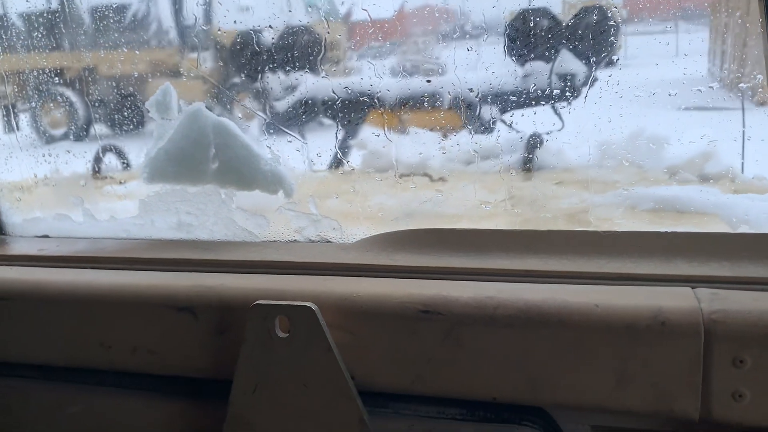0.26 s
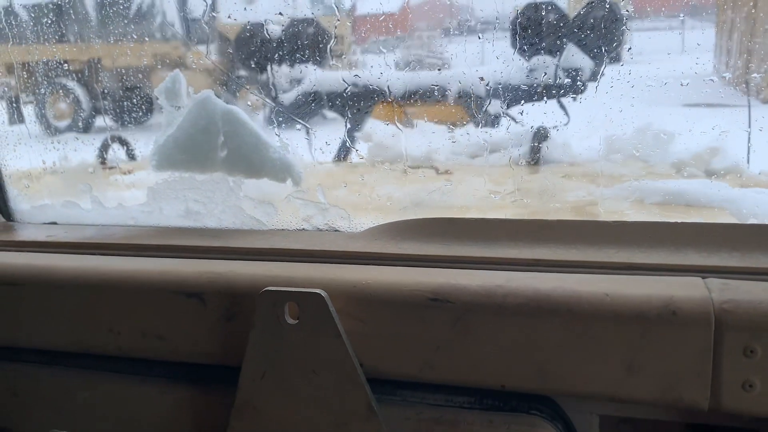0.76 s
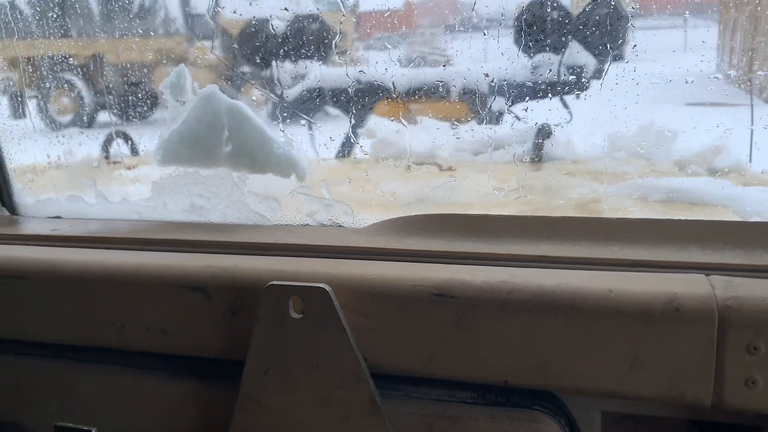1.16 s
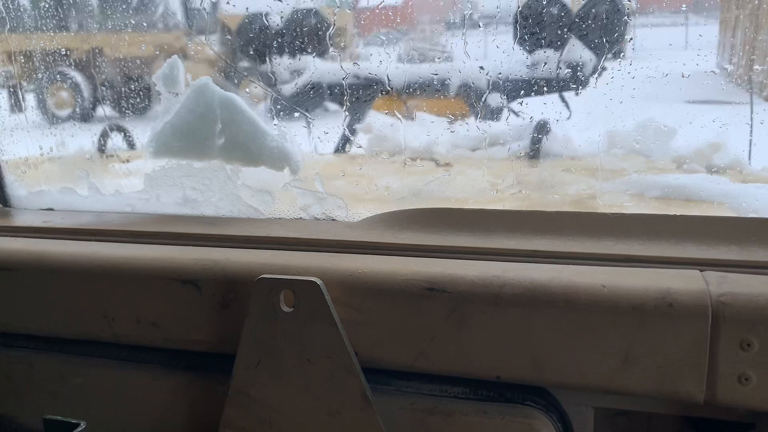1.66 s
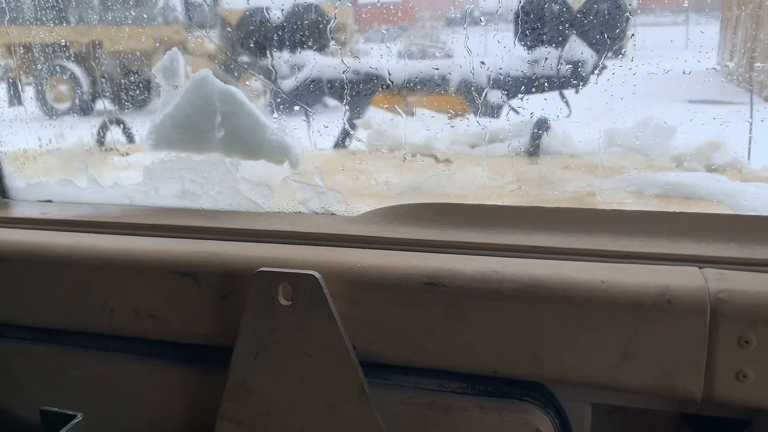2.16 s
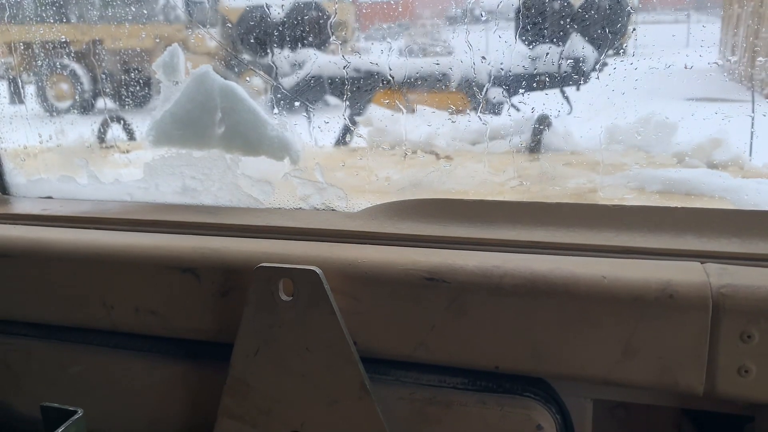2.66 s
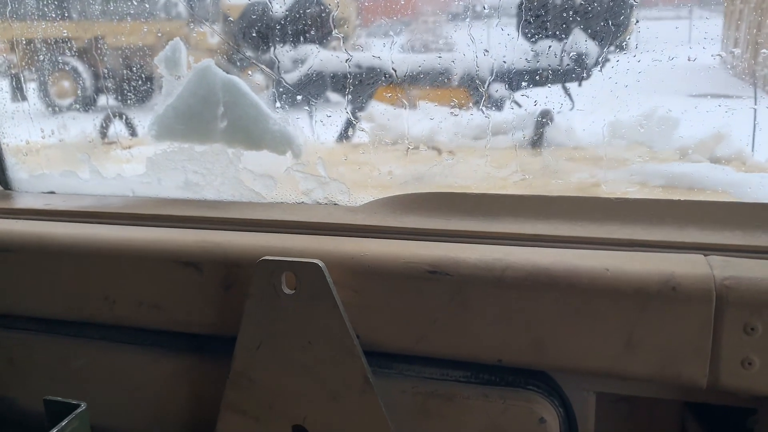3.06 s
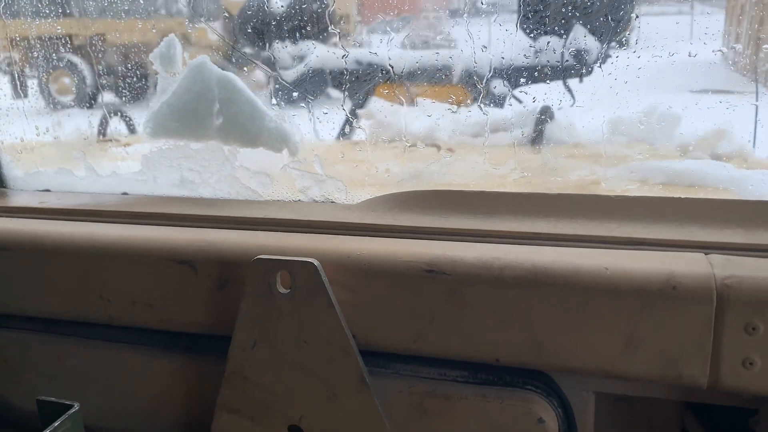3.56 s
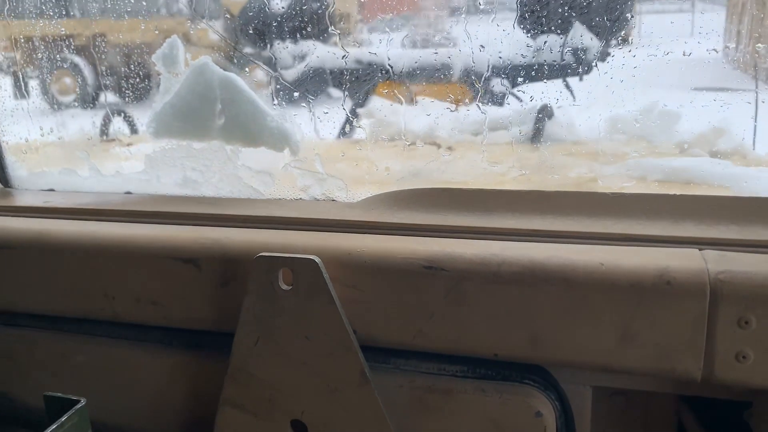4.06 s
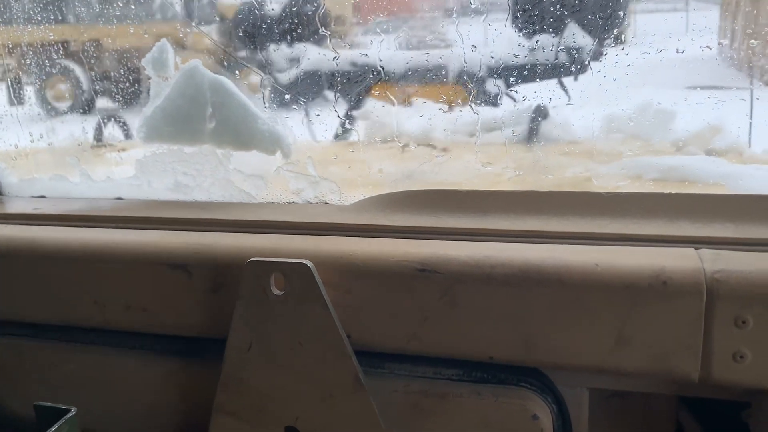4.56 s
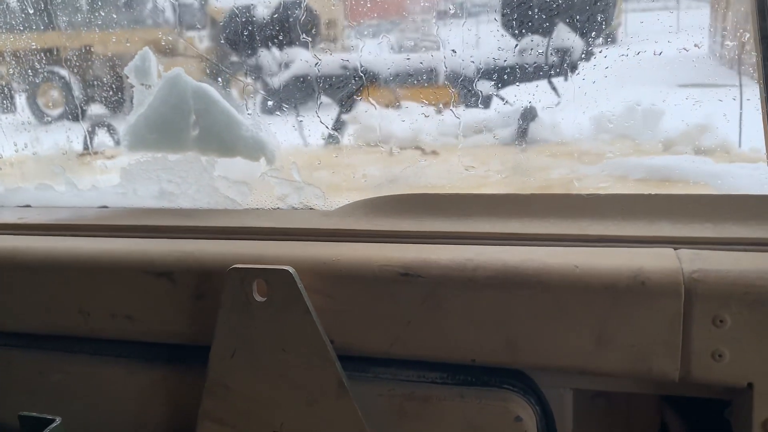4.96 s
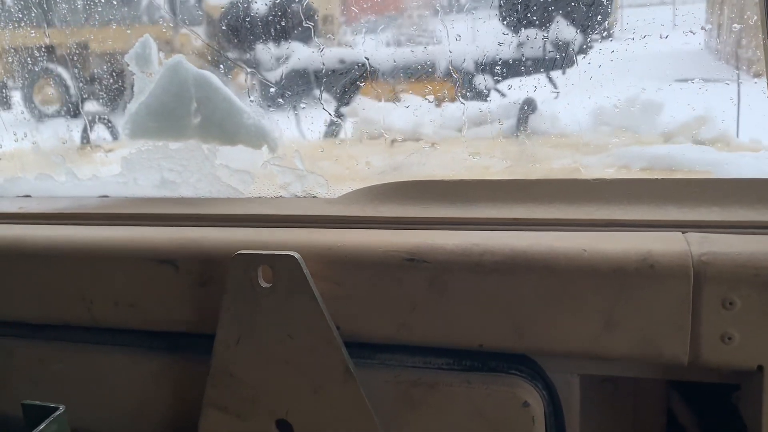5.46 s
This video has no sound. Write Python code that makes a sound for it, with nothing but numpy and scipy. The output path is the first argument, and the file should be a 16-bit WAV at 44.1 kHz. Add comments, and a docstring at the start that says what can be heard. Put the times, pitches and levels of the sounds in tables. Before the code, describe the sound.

Close stereo pickup in a truck-like cab: heavy, lumpy diesel idle, with sharp metallic knocking, ticking valve gear and steady mechanical whirr over a deep body rumble. One bright clank comes around two seconds, two thumpier ones just after three. Knocks stretch apart after four and a half seconds, the engine dies at about five, and soft low throbs fade away.

```python
"""An eight-cylinder diesel idles unevenly, heard in stereo inside a closed cab, then is switched off.
Exhaust pulses and jolts ring the cab's boom modes. One loose joint knocks hard once a cycle and softly
about half a cycle later: noise bursts rung through the block, with short pings and pitched touches.
Metal clanks in the cab with low thumps; the engine coasts to rest and the cab rocks in dull throbs."""
import sys
import numpy as np
from scipy import signal
from scipy.fft import rfft, irfft, next_fast_len
from scipy.io import wavfile

SR = 44100
rng = np.random.default_rng(int(sys.argv[2]) if len(sys.argv) > 2 else 0)


def store_wav(level_fs):
    """Save 16-bit WAV to argv[1]."""
    pcm = np.round(np.clip(np.atleast_2d(level_fs), -1, 1) * 32767)
    wavfile.write(sys.argv[1], SR, pcm.T.astype(np.int16))


N = 251370
PAD = next_fast_len(N + SR)
HZ = np.maximum(np.arange(PAD // 2 + 1) * SR / PAD, 1)
TIME = np.arange(N) / SR


def amp(db):
    """dB to gain."""
    return 10 ** (np.asarray(db) / 20)


def rms_one(x):
    """Scale to unit rms."""
    return x / np.sqrt(np.mean(x ** 2) + 1e-20)


def at_hz(points, hz, column=1):
    """Read one column of a table along a log-frequency axis."""
    points = np.array(points)
    return np.interp(np.log(hz), np.log(np.maximum(points[:, 0], 1)), points[:, column])


def drift(rate_hz):
    """Random wander of rms 1: white noise through two equal low-pass poles."""
    pole = np.exp(-2 * np.pi * rate_hz / SR)
    noise = rng.standard_normal(N + SR)
    return rms_one(signal.lfilter([1], [1, -2 * pole, pole * pole], noise)[SR:])


def clicks(seconds, sizes):
    """A click train; times before zero wrap to the end of the padded grid."""
    out = np.zeros(PAD)
    np.add.at(out, np.round(np.asarray(seconds) * SR).astype(int), sizes)
    return out


def mode(hz, width_hz):
    """Response of a damped mass on a spring."""
    return hz * width_hz / (hz ** 2 - HZ ** 2 + 1j * HZ * width_hz)


def swell(train, rise_s, t60_s):
    """Each click becomes a quick rise and an exponential fall, top near 1."""
    up = np.exp(-1 / (max(rise_s, 1e-4) * SR))
    down = amp(-60 / (t60_s * SR))
    return signal.lfilter([1 - up], np.convolve([1, -up], [1, -down]), train[:N] + 1e-18)


def ring(seconds, sizes, pitch_hz, t60_s):
    """Touches swell and fade as decaying tones, envelopes peaking at the given times; three paths."""
    out = np.zeros((3, PAD))
    tau = t60_s / np.log(1000)
    age = TIME[:int(8 * tau * SR)]
    shape = np.e * age / tau * np.exp(-age / tau)
    signs = rng.choice([-1, 1], (len(seconds), 3, 1))      # polarity differs between paths
    starts = ((seconds - tau) * SR).astype(int)
    for first, size, pitch, sign in zip(starts, sizes, pitch_hz, signs):
        if first >= 0:
            tone = np.sin(2 * np.pi * pitch * age)
            out[:, first:first + len(age)] += sign * size * shape * tone
    return out


# The loose joint, one row per engine cycle: (start_s, hard_level_db, hard body_above_treble_db,
# ring_pitch_hz, soft_level_db, soft body_above_treble_db)
KNOCKS = [(0.0965, -1.5, -2.5, 2240, -8.5, -.5), (0.335, -1, -4.5, 2180, -8.5, 1),
          (0.5756, -2, -1.5, 2180, -9, 3), (0.817, -0.5, -4, 2240, -7.5, -2.5),
          (1.061, -0.5, -3, 3320, -7, -1), (1.3055, 0.5, -2, 2190, -7.5, 1.5),
          (1.554, -1, -0.5, 3100, -9, 1.5), (1.8084, -3, 0, 2210, -9, -2),
          (2.0624, -5.5, -0.5, 3060, -13.5, -.5), (2.3153, -2.5, 0, 3290, -10.5, -1),
          (2.5507, -2.5, -3, 3200, -6, -1), (2.7738, -1.5, -2.5, 2840, -6, -3),
          (2.9983, 0, -2.5, 3170, -7.5, -2), (3.2147, 0, -4, 2840, -8, 1), (3.4312, -1, -3, 3310, -6, -3),
          (3.6494, -1, -1, 3010, -7.5, -3), (3.878, -3, -1, 3110, -7.5, -3.5),
          (4.1127, -2.5, -2, 3110, -9.5, 2), (4.35, -3.5, -1, 2845, -14, 2.5),
          (4.637, -3.5, -0.5, 3290, -10, -4), (4.9419, -6.5, 1.5, 2800, -32, 4.5)]
# The last cycles after switch-off grow longer: duration_s of each
COAST_S = [.32, .4, .5]
SOFT_PLACE = .488   # share of the cycle from hard to soft knock


def knocks():
    """Times, treble dB and body dB of the joint's hard knocks and of the soft one following each."""
    hard_s, hard_db, body_db, _, soft_db, soft_body_db = np.transpose(KNOCKS)
    cycle_s = np.diff(np.r_[hard_s, hard_s[-1] + COAST_S[0]])
    return (hard_s, hard_db, body_db), (hard_s + SOFT_PLACE * cycle_s, soft_db, soft_body_db)


# Cylinders in firing order, places in eighths of a cycle after the hard knock:
# (exhaust_place, exhaust_level_db, jolt_place, jolt_level_db)
CYLINDERS = [(0.68, 5.1, 0.61, 4.9), (1.56, 0.7, 1.47, -0.0), (2.56, -1.1, 2.71, -7.0),
             (3.58, -2.1, 3.43, 0.8), (4.63, -8.4, 4.42, -0.5), (5.6, -3.4, 5.52, -1.1),
             (6.62, 3.6, 6.64, 4.9), (7.64, 4.5, 7.41, 3.1)]


def firings(column):
    """Times and strengths of firings by one path, from CYLINDERS column on, spread over the cycles."""
    hard_s = np.array(KNOCKS)[:, 0]
    cycle_s = hard_s[1] - hard_s[0]
    before = [hard_s[0] - 2 * cycle_s, hard_s[0] - cycle_s]
    marks = np.r_[before, hard_s, hard_s[-1] + np.cumsum(COAST_S)]
    cycles = len(marks) - 1
    place, level_db = np.transpose(CYLINDERS)[column:column + 2]
    turns = (np.arange(cycles)[:, None] + place / 8).ravel()
    seconds = np.interp(turns, np.arange(len(marks)), marks)
    uneven_db = .8 * rng.standard_normal(len(turns))
    return seconds, amp(np.tile(level_db, cycles) + uneven_db)


# Cab air modes rung by the exhaust pulses: (pitch_hz, width_hz, relative level_db, push +1 or pull -1)
BOOM = [(26.4, 40.0, -30.3, -1), (45.5, 4.0, -25.5, 1), (49.7, 4.5, -28.3, -1)]
# Cab panel modes jolted through the mounts: (pitch_hz, width_hz, relative level_db, push +1 or pull -1)
PANELS = [(73.1, 23.9, -21.7, -1), (78.9, 21.4, -22.3, 1), (99.9, 5.9, -44.1, -1), (130.5, 5.7, -56.9, 1),
          (140.5, 4.1, -64.3, 1)]
# Loose shaking of the cab, broad humps: (centre_hz, width_hz, relative level_db)
SHAKE = [(45, 15, -15.5), (65.4, 17, 1.5), (118.5, 11, -2.5), (123.8, 15, -5)]


def boom(level_db, shake_db):
    """Exhaust pulses ring the cab air, jolts ring the panels, and shaped noise is the loose shake."""
    air, panels = [sum(sign * amp(db) * mode(hz, width) / width for hz, width, db, sign in modes)
                   for modes in (BOOM, PANELS)]
    humps = np.sqrt(sum(abs(amp(db) * mode(hz, width)) ** 2 for hz, width, db in SHAKE))
    low_cut = signal.freqs(*signal.butter(4, 28, "high", analog=True), HZ)[1]
    exhaust = rfft(clicks(*firings(column=0))) * air
    jolted = rfft(clicks(*firings(column=2))) * panels
    pulses, jolts = irfft(np.array([exhaust, jolted]) * low_cut, PAD)[:, :N]
    noise = rfft(rng.standard_normal((2, PAD)))
    shaken = rms_one(irfft(noise * humps * low_cut, PAD)[:, :N])
    # left and right share the first noise and differ in the second
    shaken = np.array([shaken[0] + 0.047 * shaken[1], shaken[0] - 0.65 * shaken[1]])
    return amp(level_db) * (rms_one(pulses + jolts) + amp(shake_db) * shaken)


TICKS_PER_S, TICK_T60_S, TICK_DB = 220, .014, 1   # small blows inside a knock, over its smooth rattle


def small_blows():
    """Uneven quick ticks as an envelope of rms 1."""
    train = (rng.random(N) < TICKS_PER_S / SR) * rng.exponential(1, N)
    return rms_one(1 + amp(TICK_DB) * swell(train, 2e-4, TICK_T60_S))


# A knock swells later in the body than in the treble:
# (band_hz, hard_rise_s, hard_t60_s, soft_rise_s, soft_t60_s)
KNOCK_SHAPE = [(303, 0.028, 0.15, 0.055, 0.64), (700, 0.03, 0.14, 0.023, 0.29),
               (2016, 0.0096, 0.2, 0.0091, 0.22), (4940, 0.0063, 0.12, 0.0043, 0.38),
               (12100, 0.0013, 0.21, 0.0071, 0.1)]
# Smooth colours of the rattle: (band_hz, hard_knock_db, soft_knock_db, whirr_db)
COLOUR = [(137, 6, -6.5, -11), (234, -10.5, -8, -12), (393, -6, -11, -8), (680, 4.5, 1.5, -8.5),
          (1094, -3.5, -3.5, -10.5), (1706, -10.5, -10.5, -18), (2630, -8.5, -11, -20.5),
          (3700, -11.5, -20, -29), (5100, -14, -25.5, -33), (7250, -24.5, -34, -37.5),
          (8900, -25.5, -29, -41.5), (16000, -26, -36.5, -43.5)]
KNOCK_LEAD_S = 0.0078   # the rattle starts just before the blow peaks
KNOCK_RAGGED_S, KNOCK_COLOUR_DB = .003, 1.4   # spread of start and level from band to band


def knock_power(hz, body, blows):
    """The loose joint in one band: hard and soft bursts, broken into small blows in the treble."""
    power = 0
    for soft, (start_s, treble_db, body_db) in enumerate(knocks()):
        sizes = amp(treble_db + body * body_db + rng.normal(0, KNOCK_COLOUR_DB, len(start_s)))
        rise_s = at_hz(KNOCK_SHAPE, hz, column=1 + 2 * soft)
        t60_s = at_hz(KNOCK_SHAPE, hz, column=2 + 2 * soft)
        ragged_s = rng.uniform(0, KNOCK_RAGGED_S, len(start_s))
        knock = swell(clicks(start_s - KNOCK_LEAD_S + ragged_s, sizes), rise_s, t60_s)
        colour = amp(at_hz(COLOUR, hz, column=1 + soft))
        power = power + (knock * blows ** (1 - body) * colour) ** 2
    return power


def whirr_power(hz, noise_db, tilt_db, ticks):
    """Steady mechanical noise in one band, wandering in level and ticking with the firings."""
    tilted_db = at_hz(COLOUR, hz, column=3) + tilt_db * np.log2(hz / 500)
    return (ticks * amp(noise_db + tilted_db + 2.0 * drift(22))) ** 2


# Engine block and panel modes: (pitch_hz, width_hz, level_db beside the 0.75 that passes unrung)
BLOCK = [(217.5, 16, 8), (346, 82, 8.5), (445, 15, 6), (552, 16.3, 5.5), (643, 22, 6), (684, 44, 4),
         (777, 8.9, 9), (887, 36, -1.5), (977.5, 15, 2.5), (1390, 22, 5.5), (1578, 14, 5), (1752, 22, 4.5),
         (1990, 150, -1.5), (2207, 27, 2.5), (2846, 26, -1), (3245, 34, 1), (3400, 260, -9),
         (4490, 20.4, 2.5), (5710, 59, -3), (6560, 70, -6.5), (7270, 90, -3.5)]


def metal(noise_db, tilt_db, grain_db, tick_db):
    """Noise in bands under knock, whirr, clank and air envelopes, all rung through the block."""
    grain = amp(grain_db * drift(260))      # loose parts touch unevenly
    white = rng.standard_normal((3, N)) * rms_one(grain)
    fired_s, strength = firings(column=2)
    impacts = [small_blows() for pair in range(2)]
    ticks = 1 + amp(tick_db) * swell(clicks(fired_s, strength), 0.0033, 0.2)
    out = 0
    for k, hz in enumerate(150 * 2 ** np.arange(0, 7, 2 / 3)):
        body = np.clip(np.log2(2600 / hz) / 1.5, 0, 1)      # 1 in the body, 0 in the treble
        power = cab_air_power(hz) + knock_power(hz, body, impacts[k // 2 % 2])
        power = power + whirr_power(hz, noise_db, tilt_db, ticks) + clank_hiss(hz, body) ** 2
        octaves = np.log2(HZ / hz)
        band = np.cos(np.pi / 2 * np.clip(octaves * 3 / 2, -1, 1)) ** 2
        out = out + band * rfft(white * np.sqrt(power), PAD)
    return out * (0.75 + sum(1j * amp(db) * mode(hz, width) for hz, width, db in BLOCK))


CHATTER_S, CHATTER_DB_PER_S = .035, -200   # span of the bounces and their fade
# Quick touches of the joint in a hard knock: delay_s of each
PING_TOUCHES_S = [0.0034, 0.012, .016]
PING_DB, PING_T60_S = -25.5, 0.024   # level relative to the hard knock, ring time


def pings():
    """Each hard knock rings the joint in three quick touches at its own pitch."""
    start_s, knock_db, _, pitch_hz, *_ = np.transpose(KNOCKS)
    out = 0
    for late_s in PING_TOUCHES_S:
        chance = rng.standard_normal((len(start_s), 2))
        seconds = start_s + late_s + 0.00074 * chance[:, 0]
        level_db = PING_DB + knock_db + CHATTER_DB_PER_S * late_s + 1.2 * chance[:, 1]
        out = out + ring(seconds, amp(level_db), pitch_hz, PING_T60_S)
    return rfft(out, PAD)


# Short pitched touches recurring every cycle, some inside the hard and soft knocks:
# (place as share of the cycle, pitch_hz, level_db relative to its knock, t60_s)
TOUCHES = [(0, 2620, -39.5, .006), (.01, 1342, -30, 0.027), (.01, 948, -28, .025), (.025, 2200, -34, 0.015),
           (.03, 3315, -32.5, 0.0094), (0.029, 4410, -33, .012), (0.019, 5660, -42.5, 0.0091),
           (.07, 2930, -46.5, 0.012), (.11, 1360, -33.5, 0.028), (.12, 953, -31, .03),
           (0.122, 338, -31, 0.041), (.15, 2190, -39, 0.017), (0.189, 702, -26, 0.028),
           (0.208, 349.7, -28, 0.036), (.28, 684, -33, .03), (.49, 2390, -29, 0.0082),
           (.5, 2097, -23.5, 0.017), (.52, 3166, -34.5, .03), (.58, 654, -26.5, 0.056),
           (.58, 2188, -28.5, 0.021), (.635, 1362, -24, .025), (.65, 2880, -38.5, .012),
           (0.671, 353.3, -20, 0.041), (0.711, 797, -28.5, .03), (.79, 692, -35.5, .03),
           (0.811, 1995, -35, .025), (0.849, 356, -28, 0.036), (0.881, 1454, -35, 0.032),
           (0.901, 631, -25, 0.031), (.91, 2020, -32.5, 0.033), (.92, 3250, -43.5, .03)]
TOUCH_SPREAD_DB, TOUCH_JITTER_S = 1.73, 0.00151
TOUCH_DETUNE = .035   # every touch rings a little off pitch (share)


def cycle_touches():
    """Knock rings and valve-gear contacts: each touch bounces and rings, its level following a knock."""
    (hard_s, hard_db, _), (soft_s, soft_db, _) = knocks()
    cycle_s = (soft_s - hard_s) / SOFT_PLACE
    hard_s = np.r_[hard_s[0] - cycle_s[0], hard_s]      # one cycle more in front
    cycle_s = np.r_[cycle_s[0], cycle_s]
    count = len(cycle_s)
    out = 0
    for place, hz, db, t60_s in TOUCHES:
        knock_db = hard_db if place < SOFT_PLACE else soft_db
        chance = rng.standard_normal((count, 2))
        seconds = hard_s + place * cycle_s + TOUCH_JITTER_S * chance[:, 0]
        level_db = np.r_[knock_db[0], knock_db] + db + TOUCH_SPREAD_DB * chance[:, 1]
        # a touch and five bounces
        late_s = np.c_[np.zeros(count), rng.uniform(0, CHATTER_S, (count, 5))]
        pitch_hz = hz * (1 + TOUCH_DETUNE * rng.standard_normal(late_s.shape))
        touch_s = seconds[:, None] + late_s
        sizes = amp(level_db[:, None] + CHATTER_DB_PER_S * late_s)
        out = out + ring(touch_s.ravel(), sizes.ravel(), pitch_hz.ravel(), t60_s)
    return rfft(out, PAD)


# Short rings of the last click, and faint rings around it: (peak_s, pitch_hz, level_db, t60_s)
LAST_RINGS = [(5.07, 2000, -41, .04), (5.089, 1815, -33, .03), (5.111, 310.7, -35, 0.072),
              (5.115, 4300, -58, 0.028), (5.226, 2560, -34, 0.014), (5.231, 4700, -46, .012),
              (5.228, 3200, -36, 0.013), (5.231, 1930, -50, 0.044), (5.226, 4200, -47, .02),
              (5.289, 1140, -55, 0.032), (5.31, 2450, -62, .06), (5.34, 1850, -64, 0.045),
              (5.43, 1850, -67, 0.059), (5.53, 1194, -66, 0.046), (5.63, 1700, -66.5, .08)]


def last_rings():
    """Single decaying tones near the end, each swelling and fading once."""
    return rfft(sum(ring(np.array([s]), [amp(db)], [hz], t60) for s, hz, db, t60 in LAST_RINGS), PAD)


# Blows on metal in the cab: (start_s, hiss_level_db, body_above_treble_db, hiss_t60_s, hiss_edge_hz,
# ring_level_db, ring_pitch_hz)
CLANKS = [(2.072, -4, 0, 0.058, 16250, -26, 1450), (3.119, -11, 12, 0.088, 12600, -13, 1306),
          (3.318, -22.5, 4, 0.093, 9200, -31, 3050), (5.22, -27.5, -19, 0.07, 5560, -49, 2620)]


def clank_hiss(hz, body):
    """Noise envelope of the metal blows in one band, weakening above each blow's edge."""
    out = 0
    for start_s, level_db, low_db, t60_s, edge_hz, *_ in CLANKS:
        size = amp(level_db + body * low_db) / (1 + (hz / edge_hz) ** 4)
        out = out + swell(clicks([start_s], size), .0014, t60_s)
    return out


# Modes of a struck bracket: (multiple of its pitch, level_db relative to the blow, t60_s)
BRACKET = [(.29, -18, 0.038), (0.589, -5.5, 0.073), (.76, -6, 0.065), (.87, -2, 0.045), (1.0, 18.5, 0.02),
           (1.43, -12, .055), (1.75, -14.5, 0.049), (2.539, -32.5, 0.055)]


def brackets():
    """Each blow rings the bracket modes at its own pitch; chatter roughens every mode."""
    out = np.zeros(N)
    for start_s, *_, ring_db, pitch_hz in CLANKS:
        first = round(start_s * SR)
        age = TIME[:min(SR // 4, N - first)]
        for multiple, db, t60_s in BRACKET:
            chatter_db = np.interp(age, age[::150], rng.normal(0, 1.9, len(age[::150])))
            rise = 1 - np.exp(-age / 0.0051)
            envelope = amp(ring_db + db + chatter_db - 60 * age / t60_s) * rise
            out[first:first + len(age)] += envelope * np.sin(2 * np.pi * pitch_hz * multiple * age)
    return out


# Low thumps, then dull throbs of the cab rocking after the engine stops:
# (start_s, starting pitch_hz, level_db before rise and panning, t60_s)
THUMPS = [(3.127, 114.3, 1.5, 0.1), (3.328, 99, -4, 0.29), (5.082, 48.8, -10, 0.3),
          (5.255, 63.3, -22, 0.13), (5.404, 61.5, -24, 0.095), (5.454, 59.3, -25, 0.34),
          (5.584, 51, -25.5, 0.32), (5.674, 61, -26.5, 0.21)]
THUMP_RISE_S = 0.0032
THUMP_SAG_PER_S = 1.3   # share of the pitch lost per second at first


def thumps():
    """Low thumps and throbs: decaying tones that sag in pitch as they fade."""
    out = np.zeros(N)
    for start_s, pitch_hz, level_db, t60_s in THUMPS:
        age = np.maximum(TIME - start_s, 0)
        envelope = amp(level_db - 60 * age / t60_s) * (1 - np.exp(-age / THUMP_RISE_S))
        sag = np.maximum(1 - THUMP_SAG_PER_S * age / 2, .5)
        out += envelope * np.sin(2 * np.pi * pitch_hz * age * sag)
    return out


# Still cab air: (band_hz, relative level_db)
CAB_AIR = [(150, 0), (341, -6), (600, -14), (1500, -17), (2400, -25.5), (3000, -50.5), (9000, -31),
           (16000, -60.5)]
CAB_AIR_DB = -45.5   # added to every band


def cab_air_power(hz):
    """Steady background noise of the still air in one band."""
    return amp(CAB_AIR_DB + at_hz(CAB_AIR, hz)) ** 2


# Stereo width by band, wide in the middle treble, narrow at the top: (band_hz, common share of the power)
COMMON_SHARE = [(150, 0.093), (400, 0.92), (700, 0.5), (1300, 0.77), (2500, 0.11), (3500, 0.05),
                (5000, 0.018), (7000, 0.02), (8500, 1), (16000, 0.76)]
# Balance of the two sides: (band_hz, left_minus_right_db)
LEFT_DB = [(150, -4.5), (250, 6.5), (500, -1), (1000, 2.5), (2000, 0.2), (4000, -1.6), (8000, -1),
           (12000, 0.5)]
LEFT_LAG_S = .00019


def stereo_pair(shared, left_own, right_own):
    """A common part that reaches the right side first, and a part of its own for each side."""
    common = np.clip(at_hz(COMMON_SHARE, HZ), 0, 1)
    late = np.exp(-2j * np.pi * HZ * LEFT_LAG_S)
    tilt = amp(at_hz(LEFT_DB, HZ) / 2)
    left = (np.sqrt(common) * shared * late + np.sqrt(1 - common) * left_own) * tilt
    right = (np.sqrt(common) * shared + np.sqrt(1 - common) * right_own) / tilt
    return irfft(np.array([left, right]), PAD)[:, :N]


# Running state of the engine: (time_s, boom_level_db before panning, mechanical_noise_db before colour)
ENGINE = [(0.0, -13.5, -10.5), (0.15, -15.5, -16), (0.45, -14.5, -18), (1.7, -15.5, -19),
          (2.65, -15, -14.5), (3.151, -16.5, -18), (3.331, -13, -14.5), (3.62, -15, -16),
          (4.27, -14, -16.5), (4.721, -20, -20), (4.889, -10, -20), (5.022, -28, -17), (5.08, -12.5, -23.5),
          (5.13, -22.5, -40.5), (5.24, -32.5, -41.5), (5.33, -37.5, -47), (5.45, -37, -50.5),
          (5.7, -39.5, -63.5)]


def scene():
    """Boom and thumps sit a little left; engine metal spreads over both sides; brackets ring centred."""
    time_s, *columns = np.transpose(ENGINE)
    boom_db, noise_db = [np.interp(TIME, time_s, column) for column in columns]
    low = boom(boom_db, shake_db=-9) + thumps()
    rattle = metal(noise_db, tilt_db=2.16, grain_db=0.5, tick_db=-9)      # tilt is per octave
    rings = pings() + cycle_touches() + last_rings()
    engine = stereo_pair(*(rattle + rings))
    return low * amp([[1.3], [-1.3]]) + engine + brackets()


def record(dry):
    """Peaks are rounded softly, then the top is cut steeply from 16900 Hz."""
    top = .95
    rounded = top * np.tanh(dry / top)
    return signal.sosfilt(signal.cheby2(12, 70, 16900, fs=SR, output="sos"), rounded)


dry = scene()
out = record(dry)
store_wav(out)
```